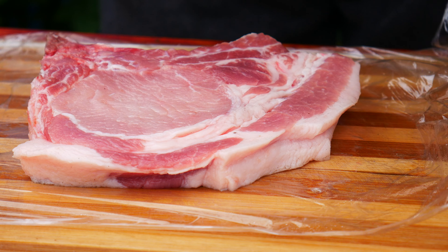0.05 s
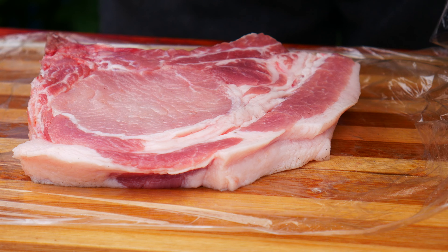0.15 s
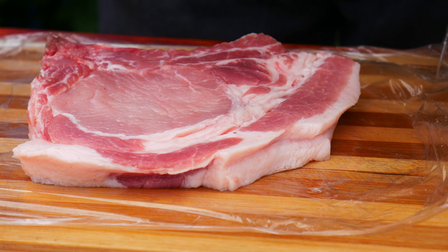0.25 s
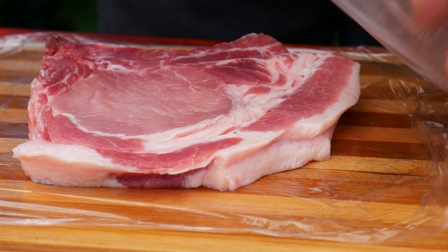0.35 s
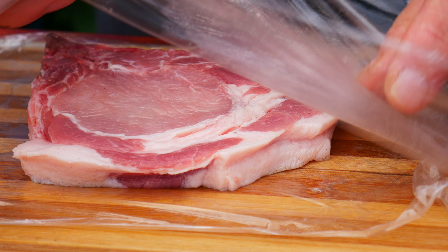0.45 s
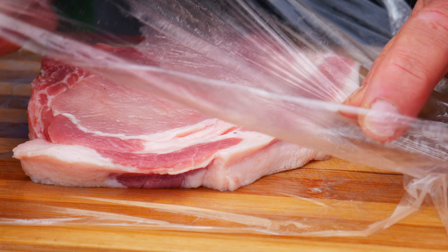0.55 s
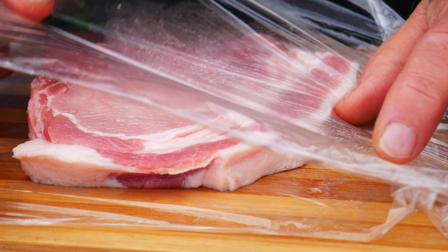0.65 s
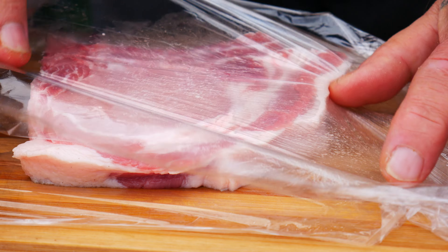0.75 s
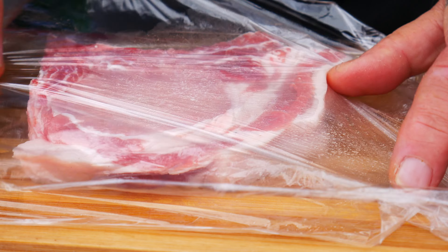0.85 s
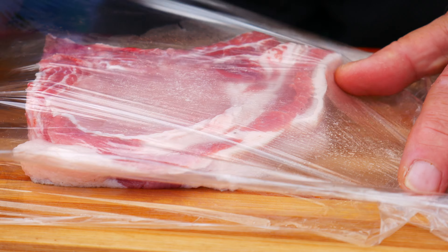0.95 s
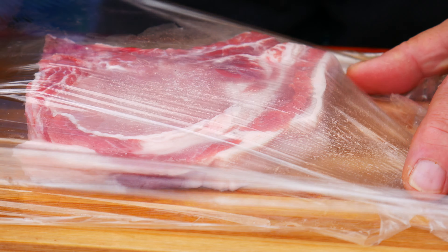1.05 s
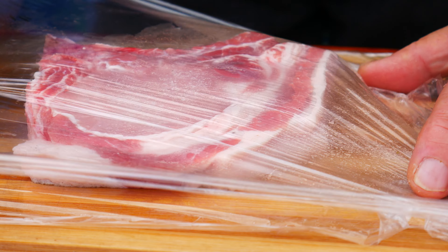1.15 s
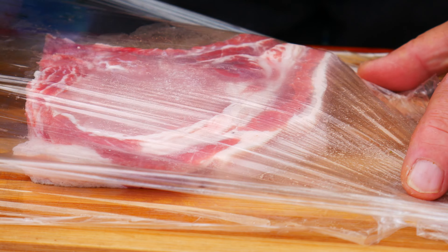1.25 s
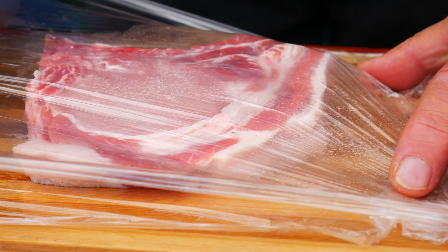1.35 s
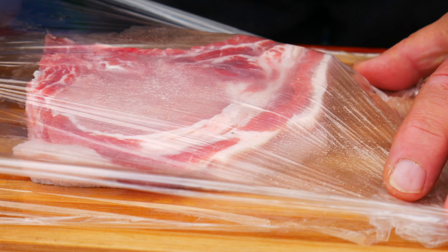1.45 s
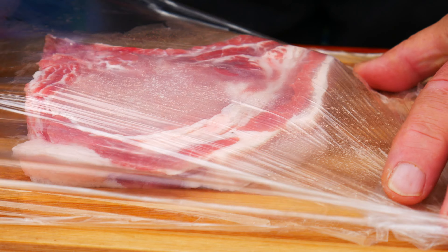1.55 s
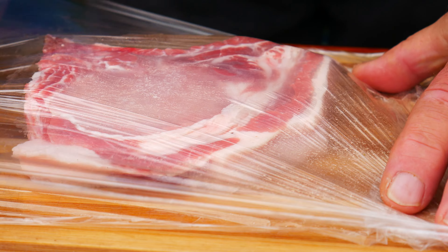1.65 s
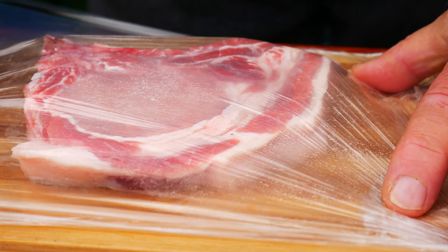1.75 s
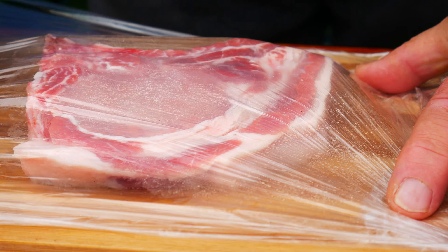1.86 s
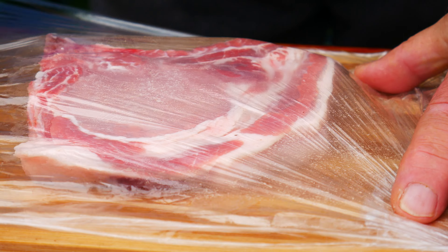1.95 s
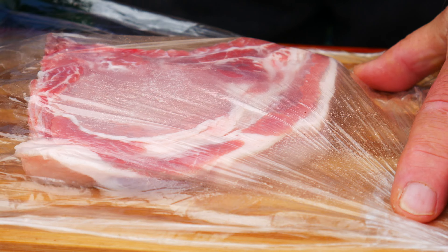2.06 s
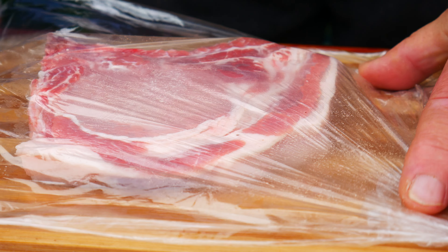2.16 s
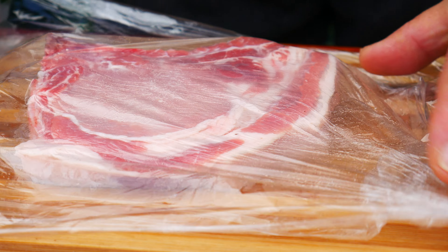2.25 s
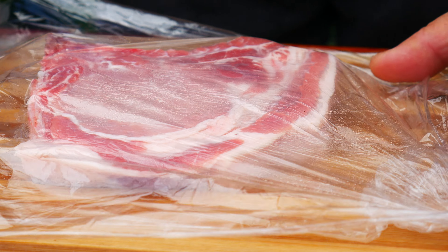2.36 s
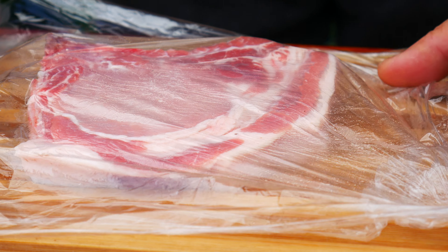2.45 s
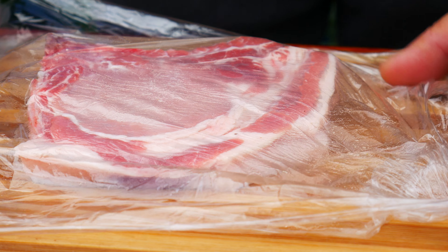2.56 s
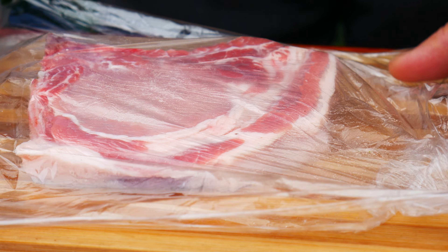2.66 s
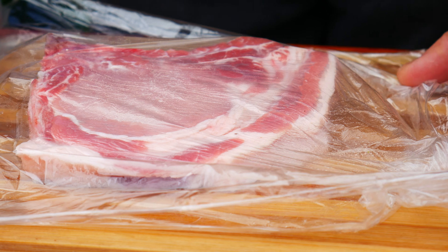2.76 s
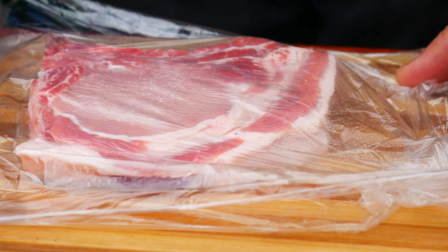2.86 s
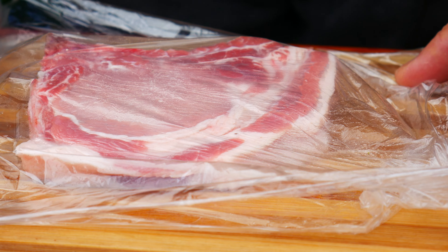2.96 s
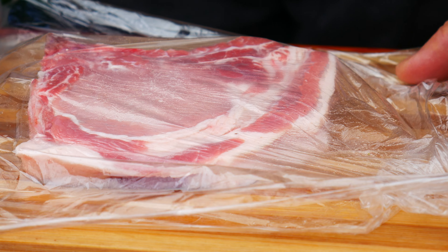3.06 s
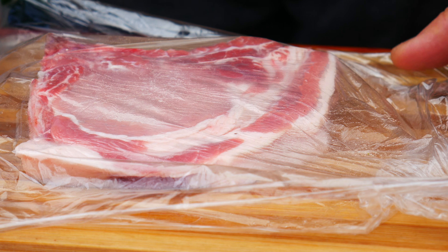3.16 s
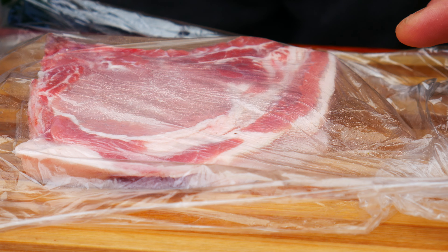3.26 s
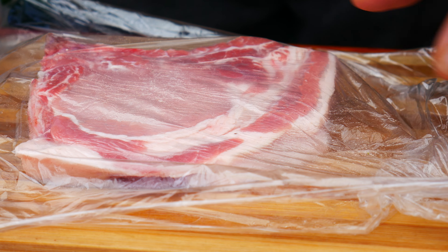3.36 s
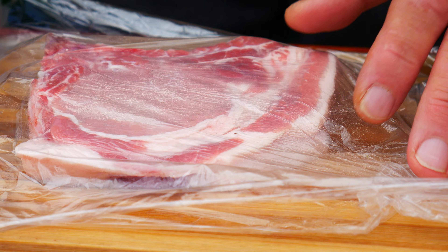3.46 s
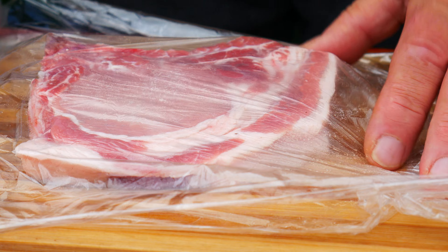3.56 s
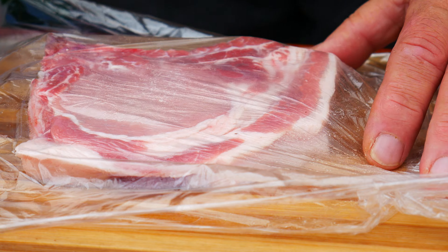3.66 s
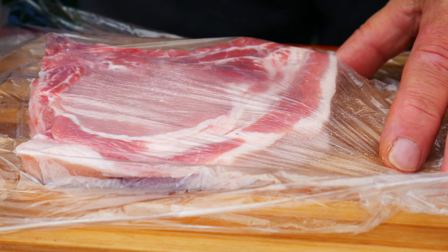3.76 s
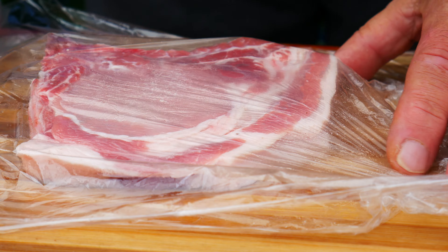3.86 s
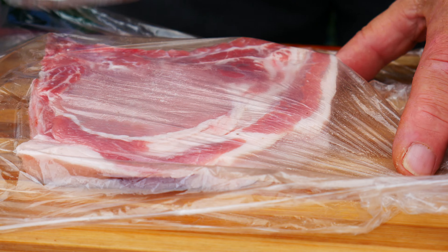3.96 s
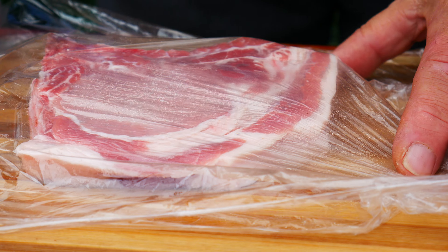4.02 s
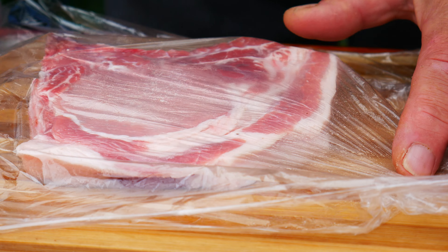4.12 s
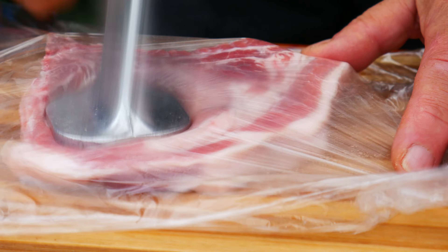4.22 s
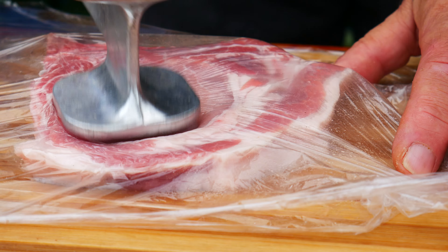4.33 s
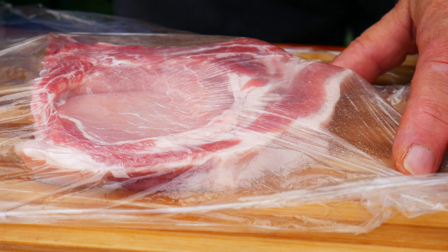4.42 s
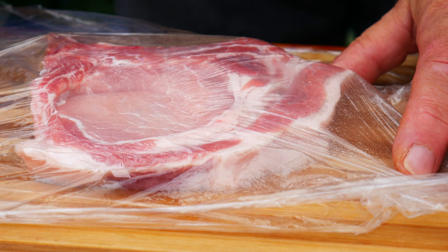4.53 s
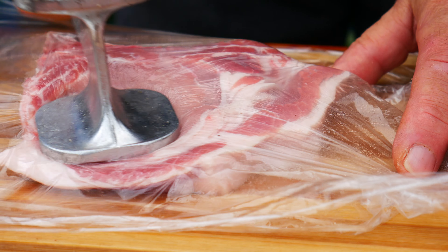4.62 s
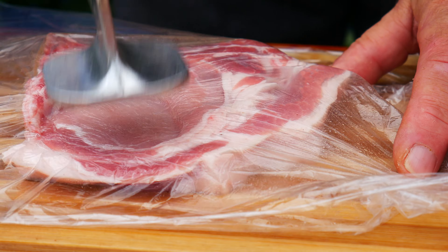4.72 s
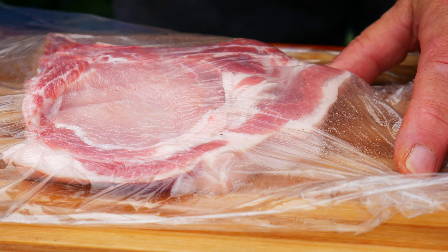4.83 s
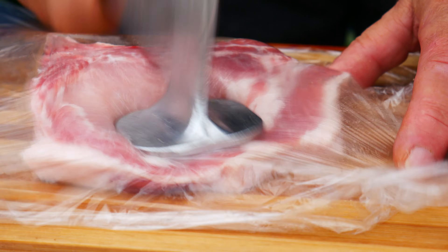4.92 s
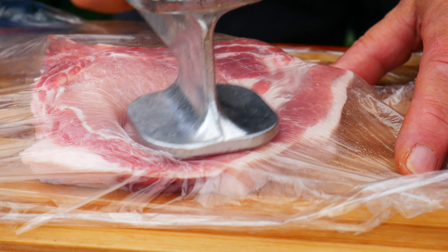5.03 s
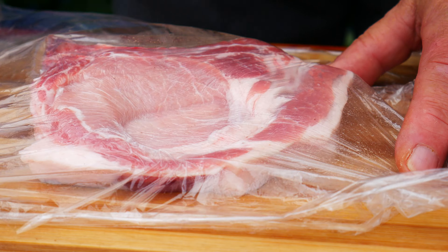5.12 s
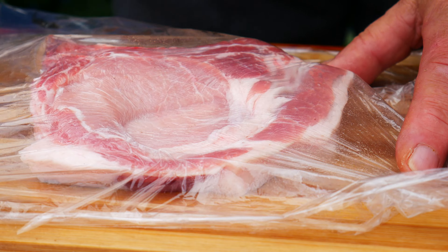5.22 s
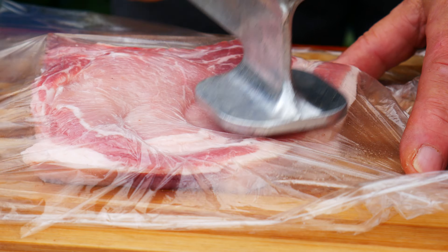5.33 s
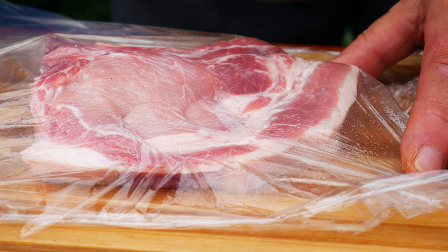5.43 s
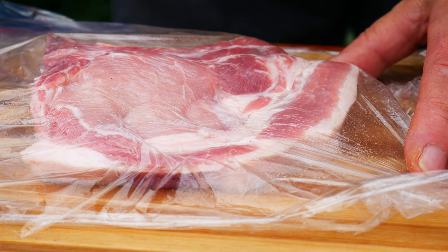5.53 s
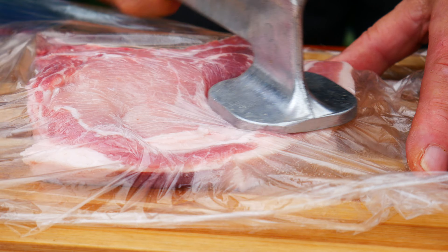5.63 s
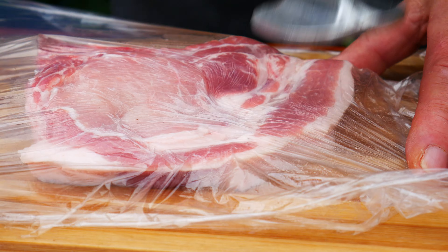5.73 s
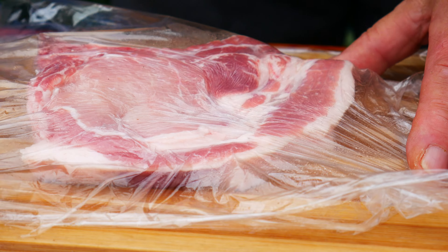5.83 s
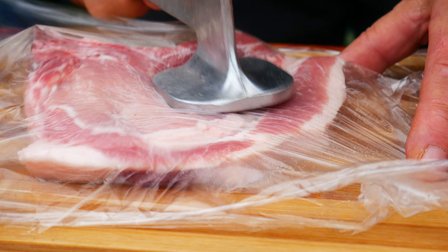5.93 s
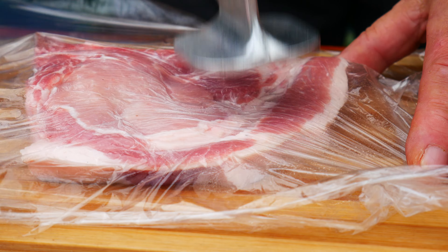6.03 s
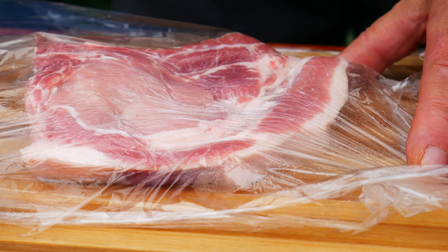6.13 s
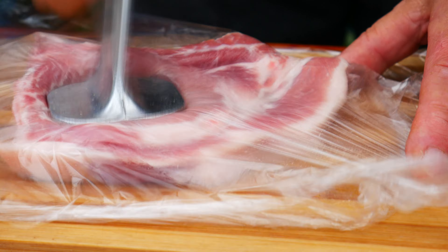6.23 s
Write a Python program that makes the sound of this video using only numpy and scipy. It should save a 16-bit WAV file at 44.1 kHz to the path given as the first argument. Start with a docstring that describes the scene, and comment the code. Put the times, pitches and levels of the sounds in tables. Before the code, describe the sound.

Cling film crackles softly, a utensil drawer knocks and rumbles, then a metal mallet pounds wrapped meat seven times, with sharp slaps and woody thuds.

```python
"""Pounding a wrapped pork chop

Cling film is pulled over the chop, and a kitchen drawer knocks, rolls and jingles as a mallet is fetched.
Then the metal mallet pounds the meat seven times: the film slaps, trapped air pops and the board thuds
on the counter of a small, lively kitchen; each blow's tail holds level briefly, then falls. Shaped noise
makes the air, rubbing, slaps and reflections; random clicks make the crackle and rolling; dying sines
make the wood, steel and popping air.
"""
import sys
import numpy as np
from scipy import signal
from scipy.fft import rfft, irfft
from scipy.io import wavfile
from scipy.ndimage import uniform_filter1d

SR = 44100
rng = np.random.default_rng(int(sys.argv[2]) if len(sys.argv) > 2 else 0)


def output_pcm(signal):
    """Save a mono or channel-first signal as 16-bit PCM at the path in sys.argv[1].

    Samples are clipped to [-1, 1] before scaling.
    """
    pcm = np.clip(np.atleast_2d(signal).T, -1, 1) * 32767
    wavfile.write(sys.argv[1], SR, np.round(pcm).astype(np.int16))


N = 277212
TIME = np.arange(round(.7 * SR)) / SR  # clock of one short sound [s]


def amp(db):
    """Turns decibels into gain."""
    return 10 ** (np.asarray(db) / 20)


def unit(x):
    """Scales a sound to an rms of one."""
    return x / np.sqrt(np.mean(x ** 2) + 1e-20)


def read(points, hz):
    """Reads a table between its points, on a log-frequency axis."""
    f, value = np.transpose(points)
    return np.interp(np.log(hz + 1), np.log(f + 1), value)


def add(mix, s, sound):
    """Mixes a sound in at time s [s]."""
    part = mix[round(s * SR):][:len(sound)]
    part += sound[:len(part)]


def wander(n, size):
    """Smooth chance that changes over about size samples; rms one."""
    once = uniform_filter1d(rng.standard_normal(n), size, mode="wrap")
    return unit(uniform_filter1d(once, size, mode="wrap"))


def grains(per_s, spread_db):
    """Random clicks, a few much larger than the rest; rms one."""
    size = amp(spread_db * np.minimum(rng.exponential(1, N), 4.5))
    happens = rng.random(N) < per_s / SR
    return unit(size * rng.standard_normal(N) * happens)


def bumps(per_s):
    """Random clicks of much the same size, pushing either way."""
    happens = rng.random(N) < per_s / SR
    return rng.uniform(.4, 1, N) * rng.choice([-1, 1], N) * happens


def strokes(rows, sag_db_per_s, release_db_per_s):
    """Gain of hand movements: each swells smoothly, sags while it is held, then dies away faster."""
    gain = np.zeros(N)
    for s, attack, hold, db in rows:
        t = np.arange(N) / SR - s
        swell = np.sin(np.pi / 2 * np.clip(t / attack, 0, 1)) ** 2
        sag = sag_db_per_s * np.maximum(t - attack, 0)
        release = release_db_per_s * np.maximum(t - attack - hold, 0)
        gain = np.hypot(gain, swell * amp(db - sag - release))
    return gain


def ring(hz, t60):
    """One mode: a sine that falls by 60 dB in t60 seconds."""
    return np.sin(2 * np.pi * hz * TIME) * 10 ** (-3 * TIME / t60)


def rise(seconds):
    """A soft start."""
    return 1 - np.exp(-TIME / seconds)


def colour(x, points, tilt=0, low_hz=1):
    """Gives x a spectrum, tilted [dB per octave] about the low middle and cut below low_hz; rms one."""
    hz = np.fft.rfftfreq(len(x), 1 / SR) + 1
    low_cut = np.hypot(1, (low_hz / hz) ** 2)
    gain = amp(read(points, hz) + tilt * np.log2(hz / 450)) / low_cut
    return unit(irfft(rfft(x) * gain, len(x)))


# share of the decay held back, by frequency: (frequency [Hz], share [0-1])
HOLD_SHARE = [(60, 0), (130, 0.42), (250, 1), (480, 0.8), (850, 0.02), (2000, 0.31), (12000, 0.29)]


def fall(hz, t60, hold_s):
    """Decay of one band, held back for the first hold_s seconds; the far room lingers faintly."""
    held = np.clip(read(HOLD_SHARE, hz), 0, 1) * np.minimum(TIME, hold_s)
    near = 10 ** (-3 * (TIME - held) / t60)
    fade = np.cos(np.pi / 2 * TIME / TIME[-1])
    far = amp(-23) * np.exp(-TIME / (.5 * t60)) * fade
    return np.hypot(near, far)


# how fast the kitchen's sound dies when not held: (frequency [Hz], time to fall 60 dB [s])
KITCHEN_DECAY = [(50, 0.16), (130, 0.26), (400, 0.27), (900, 0.28), (2500, 0.27), (6000, 0.29),
                 (14000, 0.11)]


def tail(points, tilt=0, low_hz=1, hold_s=0, count=16):
    """Dense reflections: each band is steady noise that dies at the kitchen's own rate."""
    spectrum = rfft(colour(rng.standard_normal(len(TIME)), points, tilt, low_hz))
    centres = np.geomspace(45, 15000, count)
    log_hz = np.log(np.fft.rfftfreq(len(TIME), 1 / SR) + 1)
    place = np.interp(log_hz, np.log(centres), np.arange(count))
    out = np.zeros(len(TIME))
    for k, hz in enumerate(centres):
        share = np.maximum(1 - abs(place - k), 0)  # neighbouring bands overlap as triangles
        band = irfft(spectrum * share, len(TIME))
        # even out the slow swells of the noise before letting it die
        swell = np.sqrt(uniform_filter1d(unit(band) ** 2, size=1500, mode="wrap") + 1e-6)
        out += band / swell * fall(hz, read(KITCHEN_DECAY, hz), hold_s)
    return out


# spectrum of the kitchen air: (frequency [Hz], relative level [dB])
AIR_SPECTRUM = [(15, -43.5), (25, -25.5), (59, 0.5), (97, -21), (120, -6), (175, -16.5), (384, -15),
                (427, -13), (575, -15), (624, -13), (1480, -32), (4870, -36), (16000, -45)]
AIR_DB = -63


def kitchen_air():
    """The quiet air of the kitchen: steady noise, strongest in the bass."""
    return amp(AIR_DB) * colour(rng.standard_normal(N), AIR_SPECTRUM)


# resonances of the stretched film: (frequency [Hz], width [Hz], level [dB])
FILM_RESONANCES = [(1140, 95, 7.5), (2180, 350, 2.5), (3480, 550, -1.5), (4650, 550, -3.5),
                   (7300, 7400, -12)]
# pulls that tighten, hold and go slack: (start [s], tightening [s], holding [s], level [dB])
FILM_PULLS = [(.15, 0.75, 0.38, -60.5), (1.48, 0.066, 1.95, -69.5), (3.5, .08, 0.22, -72.5),
              (4.45, 0.036, 0.41, -62), (5.83, 0.038, 0.17, -62)]
# single wrinkles snapping: (time [s], level [dB])
WRINKLE_SNAPS = [(1.056, -43.5), (4.518, -37)]
EASE_DB_PER_S, SLACK_DB_PER_S = 2.5, 81.5  # tension eases from the tightening on; slack adds to the fall
HISS_DB, CRINKLE_DB, CRINKLES_PER_S = -3.5, -4, 1400
SNAP_S = 0.0046  # how quickly a snap dies


def film():
    """Rubbing hiss, fine crackle and single snaps sound through the resonances of the taut film."""
    hz = np.geomspace(200, 16000, num=200)
    power = np.zeros(len(hz))
    for centre, width, db in FILM_RESONANCES:
        power += amp(db) ** 2 / (1 + (2 * (hz - centre) / width) ** 2) ** 1.3
    spectrum = np.transpose([hz, 10 * np.log10(power)])
    uneven = amp(2.5 * wander(N, size=500))
    crinkle = colour(grains(CRINKLES_PER_S, 2.7) * uneven, spectrum, tilt=1.2)
    hiss = colour(rng.standard_normal(N), spectrum, tilt=-.4)
    tension = strokes(FILM_PULLS, EASE_DB_PER_S, SLACK_DB_PER_S)
    out = tension * (amp(HISS_DB) * hiss + amp(CRINKLE_DB) * crinkle)
    for s, db in WRINKLE_SNAPS:
        snap = colour(rng.standard_normal(len(TIME)), spectrum, tilt=-6.5, low_hz=600)
        add(out, s, amp(db) * snap * np.exp(-TIME / SNAP_S))
    return out


# sticky film letting go of wet meat or steel: (time [s], length [s], level [dB])
FILM_PEELS = [(0.412, .12, -69), (4.476, 0.047, -56.5), (5.83, 0.088, -63.5)]


def peels():
    """Sticky film lets go in a short, bright sizzle of many small clicks."""
    out = np.zeros(N)
    spectrum = [(1500, -6), (4500, 2), (9000, -1), (12000, -12), (16000, -16)]  # (Hz, dB)
    sizzle = colour(grains(5000, 1.6), spectrum)
    for s, length, db in FILM_PEELS:
        part = sizzle[round(s * SR):][:round(length * SR)]
        add(out, s, amp(db) * part * signal.windows.tukey(len(part), .4))
    return out


# film squeaking as it stretches over the wet meat: (time [s], length [s], settled pitch [Hz],
# starting distance from that pitch [octaves], level [dB], overtones over the main tone [dB])
FILM_SQUEAKS = [(1.381, 0.06, 320, 0.53, -58.5, -0.5), (1.57, 0.051, 341, 0.41, -54.5, -1.5),
                (1.575, 0.12, 688, -0.34, -56, -27),
                (4.42, 0.037, 2550, 0.87, -59.5, -30),(5.815, 0.14, 509, -0.12, -34.5, -10)]
SETTLE_SHARE, WAVER = 0.229, 0.047  # share of its length a squeak takes to settle; rms pitch waver


def squeaks():
    """Taut film sticks and slips: each squeak swells and fades while its wavering pitch glides and settles."""
    out = np.zeros(N)
    for s, length, settled_hz, bend, db, over_db in FILM_SQUEAKS:
        u = np.arange(0, length, 1 / SR) / length  # progress from 0 to 1
        hz = settled_hz * 2 ** (bend * np.exp(-u / SETTLE_SHARE))
        wavering_hz = hz * (1 + WAVER * wander(len(u), size=100))
        phase = 2 * np.pi * np.cumsum(wavering_hz) / SR
        overtones = np.sin(2 * phase) + amp(-14) * np.sin(3 * phase)
        tone = np.sin(phase) + amp(over_db) * overtones
        add(out, s, amp(db) * tone * np.sin(np.pi * u) ** 2)
    return out


# shoves of the drawer: (start [s], speeding up [s], coasting [s], level [dB])
DRAWER_SHOVES = [(2.1, 0.12, .52, -27), (2.85, 0.063, 0.076, -42.5), (3.15, 0.072, 0.11, -45)]
# spectrum of the rolling runners: (frequency [Hz], relative level [dB])
ROLL_SPECTRUM = [(47, -52.5), (80, -37), (129, 18.5), (170, 6), (379, 18.5), (710, 5), (2230, -29.5),
                 (3080, -61.5), (3510, -30), (4360, -25), (5650, -53), (14000, -61)]
COAST_DB_PER_S, STOP_DB_PER_S = 31.5, 233  # friction slows the drawer; halting it adds to the fall


def drawer():
    """The runners rumble with many small bumps; the loose contents clatter when the drawer moves fast."""
    speed = strokes(DRAWER_SHOVES, COAST_DB_PER_S, STOP_DB_PER_S)
    rumble = colour(unit(bumps(340)) + 0.96 * rng.standard_normal(N), ROLL_SPECTRUM)
    rattle = np.exp(-TIME / .009) * rng.standard_normal(len(TIME))
    clatter = signal.fftconvolve(bumps(150), rattle)[:N]
    clatter = colour(clatter, [(300, -2.5), (900, 8.5), (1500, -1.5), (2200, -0.5),
                               (3200, -22), (6000, -24.5), (14000, -52.5)])  # (Hz, dB)
    looseness = np.sqrt(speed / speed.max())
    return speed * (amp(-0.5) * rumble + amp(-5) * looseness * clatter)


# steel utensils touching: (time [s], level [dB], pitch that the touch rings most [Hz])
STEEL_TOUCHES = [(1.825, -59, 5530), (1.853, -59, 3260), (2.16, -63, 5400), (2.222, -47, 7000),
                 (2.28, -43.5, 8500), (2.334, -53, 5100), (2.35, -47, 3620), (2.47, -55.5, 3480),
                 (2.48, -49, 1221), (2.805, -52, 3080), (3.13, -70.5, 2870)]
# ringing modes of the utensils: (nominal frequency [Hz], level [dB], time to fall 60 dB if left alone [s])
STEEL_MODES = [(1221, 4, .8), (1432, -6, .55), (2051, -10, .45), (2943, -12, 1.5), (3490, 2, .6),
               (3645, -3, .7), (3885, -2, .45), (4725, -5, .4), (5550, -1, .32), (6620, -6, .36),
               (8095, -13, .42), (9765, -18, .55), (10485, -19, .4), (11710, -20, .5), (12975, -23, .45)]
REACH_OCTAVES = 0.19  # how far a touch spreads over the modes
FLUTTER_DB, CHATTER_DB = 2, -25.5  # rms flutter of the ring; gain of the chatter


def utensils():
    """Touches ring the nearest steel modes, whose level flutters irregularly; the rolling drawer adds chatter."""
    out, steel = np.zeros(N), np.zeros(len(TIME))
    fade = np.cos(np.pi / 2 * TIME / TIME[-1])
    for hz, mode_db, t60 in STEEL_MODES:
        steel += amp(mode_db) * ring(hz, t60) * np.exp(-TIME / .06)  # chatter dies sooner
        for s, db, touch_hz in STEEL_TOUCHES:
            flutter = amp(FLUTTER_DB * wander(len(TIME), size=700))
            distance = np.log2(hz / touch_hz) / REACH_OCTAVES
            mode = ring(hz + 4 * rng.standard_normal(), t60) * flutter / (1 + distance ** 2)
            add(out, s, amp(db + mode_db) * mode * rise(0.002) * fade)
    speed = strokes(DRAWER_SHOVES, COAST_DB_PER_S, STOP_DB_PER_S)
    touches = bumps(170) * speed ** 2 / speed.max()
    return out + amp(CHATTER_DB) * signal.fftconvolve(touches, steel)[:N]


# drawer and counter knocks: (time [s], room answer level [dB], hardness [dB per octave],
# lowest frequency [Hz], thump level [dB], thump pitch [Hz], clack level [dB])
WOOD_KNOCKS = [(0.533, -57.5, -3.5, 520, -33, 655, -83), (0.9058, -22.5, -6, 189, -14, 282, -57),
               (1.003, -42.5, 1, 237, -33, 594, -68), (1.747, -23, -6, 184, -50, 400, -59),
               (1.7692, -12, -2.5, 137, 3, 276, -39.5), (2.223, -12.5, -3.5, 263, -1.5, 1100, -42),
               (2.254, -27, 4, 232, -33, 500, -52), (2.389, -27, 0.5, 297, -19, 696, -78),
               (2.6266, -19.5, -4.5, 271.3, -4, 773, -46), (2.804, -19, 0, 426, -6, 700, -26),
               (2.82, -29, -5, 500, -33, 742, -38), (3.013, -45, 0, 340, -32, 600, -75),
               (3.207, -43, -2, 318, -26, 440, -67), (3.3495, -30.5, -5, 211, -17, 670, -70),
               (5.894, -34.5, -7.5, 220, -31, 306, -73)]
# spectrum of a wooden knock: (frequency [Hz], relative level [dB])
KNOCK_SPECTRUM = [(40, -2), (130, -6.5), (175, -6), (280, 3.5), (500, 4.5), (850, -1), (1250, -14),
                  (1600, -21.5), (2400, -22.5), (4000, -39.5), (7000, -52), (15000, -69.5)]
# spectrum of a hard clack: (frequency [Hz], relative level [dB])
CLACK_SPECTRUM = [(600, -0.5), (1600, -14), (2500, 7), (3200, 5), (4400, -12), (6000, -16.5), (8000, -16),
                  (10000, -31), (12000, -41), (15000, -40)]
# modes of the board on its counter: (nominal frequency [Hz], level [dB], time to fall 60 dB when not held [s])
BOARD_MODES = [(134.5, 2, 0.3), (211, -9.5, 0.35), (299, -1.5, 0.28), (380.5, -4.5, 0.32),
               (414.7, -3, 0.29), (527, -7, 0.41), (787, -9.5, 0.32)]


def knocks():
    """Wooden knocks: a short thump, a hard clack, the counter's lowest mode and the room's answer."""
    out = np.zeros(N)
    hum_hz, _, hum_t60 = BOARD_MODES[0]
    for s, db, tilt, low_hz, thump_db, thump_hz, clack_db in WOOD_KNOCKS:
        low_cut = np.hypot(1, (low_hz / hum_hz) ** 2)
        counter = amp(-3.0) * ring(hum_hz, hum_t60) * rise(.012) / low_cut
        early_boost = 1.09 + 0.25 * np.exp(-TIME / 0.022)
        room = tail(KNOCK_SPECTRUM, tilt, low_hz) * rise(0.0019) * early_boost + counter
        clack = tail(CLACK_SPECTRUM) * (.32 + .9 * np.exp(-TIME / .012))
        panel = ring(thump_hz, 9 / thump_hz) * rise(.5 / thump_hz)
        # the slope of the ring: a thump without a lasting push
        thump = np.gradient(panel) * SR / (2 * np.pi * thump_hz)
        add(out, s, amp(db) * room + amp(thump_db) * thump + amp(clack_db) * clack)
    return out


# mallet blows: (first touch [s], time to squeeze the air out [s], thud level [dB], air pop level [dB],
# slap level [dB], squirt pitch [Hz], squirt over the slap [dB], board drops back after the squeeze [s],
# drop level [dB])
MALLET_BLOWS = [(4.259, 0.0026, -21, 1.5, -13.5, 3620, -7.5, .11, -34.5),
                (4.6206, 0.00098, -18, 1, -3.5, 1960, -18, 0.081, -21.5),
                (4.9630, 0.0029, -19.5, -8, -16, 3710, 8.5, 0.071, -23),
                (5.292, 0.0048, -19.5, -5, -22.5, 3470, -0.5, 0.068, -22.5),
                (5.6174, 0.0058, -17.5, -11, -30.5, 3280, 5.5, .079, -26),
                (5.9343, 0.005, -16, -15, -28, 3350, 4.5, .078, -15),
                (6.2553, 0.0055, -20.5, -16, -21.5, 3550, -6, .08, -22)]
# spectrum of the film slap: (frequency [Hz], relative level [dB])
SLAP_SPECTRUM = [(500, 9), (1300, -5), (2000, 8.5), (2800, -3), (5000, -3.5), (6500, 1.5), (7900, -4.5),
                 (9800, -0.5), (11000, -5.5), (12800, -2), (16000, -10)]
SLAP_MIN_S, SLAP_SHARE = 0.0019, 0.89  # a slap lasts a moment plus a share of the squeeze


def slaps():
    """A burst of crackle and a wet squirt as the face meets the film, echoed by the counter and a wall."""
    out = np.zeros(N)
    for s, squeeze, _, _, db, squirt_hz, squirt_db, _, _ in MALLET_BLOWS:
        length = np.hypot(SLAP_MIN_S, SLAP_SHARE * squeeze)
        hiss, wet = rng.standard_normal((2, len(TIME)))
        pocket = [(squirt_hz / 1.7, -24), (squirt_hz, 0), (squirt_hz * 1.2, -5), (squirt_hz * 1.6, -28)]
        burst = colour(hiss, SLAP_SPECTRUM) + amp(squirt_db) * colour(wet, pocket)
        burst *= rise(length * 0.5) * np.exp(-(TIME / length) ** 3)
        # set the burst's energy from its length and its two levels
        burst *= amp(db) * np.hypot(1, amp(squirt_db)) * np.sqrt(length * SR / np.sum(burst ** 2))
        for delay, echo_db in [(0, -7), (.0043, -21.5), (.029, -25.5)]:  # direct, then two echoes
            add(out, s + delay, amp(echo_db) * burst)
        squelch = amp(2.5 * wander(len(TIME), size=120))
        room = (amp(-44.5) * tail(SLAP_SPECTRUM) + amp(squirt_db - 23) * tail(pocket)) * squelch
        add(out, s, amp(db) * np.sqrt(length / 0.018) * room * rise(.003))
    return out


# spectrum of the mallet's thud: (frequency [Hz], relative level [dB])
THUD_SPECTRUM = [(30, -5.5), (50, -5), (90, 8), (170, -3), (250, -0.5), (420, -1.5), (800, -3),
                 (1150, -12.5), (1600, -24.5), (4000, -39.5), (6000, -44.5), (11000, -45.5), (16000, -46.5)]
HOLD_S = 0.067  # how long the tail is held
# the flatter the face lands, the shorter the squeeze: the tail is brighter and the pop higher
FLAT_TILT_DB, DULLING_DB_PER_S = 2.5, 406  # tail brightness per octave, and its loss with squeeze time
FLAT_POP_HZ, POP_SAG_HZ_PER_S = 837, 35000  # pop pitch, and its loss with squeeze time
PUSH_DB = 12  # gain of the shove of the meat, on top of the thud level
DROP_SLAP_DB = -10.5  # gain of the meat's wet slap as the board lands, on top of the drop level


def mallet():
    """Each blow pops the air out, shoves the meat and rings the board, which hops and drops back."""
    out = np.zeros(N)
    for s, squeeze, db, pop_db, _, _, _, hop, drop_db in MALLET_BLOWS:
        board = np.zeros(len(TIME))
        for hz, mode_db, t60 in BOARD_MODES:
            cycles = hz * rng.uniform(0.99, 1.01) * TIME + rng.random()
            board += amp(mode_db) * np.sin(2 * np.pi * cycles) * fall(hz, t60, HOLD_S)
        brightness = FLAT_TILT_DB - DULLING_DB_PER_S * squeeze
        uneven = amp(2 * wander(len(TIME), size=300))
        rattle = tail(THUD_SPECTRUM, brightness, hold_s=HOLD_S) * uneven
        body = amp(1.0) * rattle * rise(0.0037) + amp(-2.0) * board * rise(0.0045)
        u = TIME / 0.0015
        push = 3.1 * u * (1 - u / 2) * np.exp(-u)  # pressure rises, then rebounds
        pop = ring(FLAT_POP_HZ - POP_SAG_HZ_PER_S * squeeze, .019) * rise(.0003)
        add(out, s + squeeze, amp(db) * (body + amp(PUSH_DB) * push) + amp(pop_db) * pop)
        drop = tail(KNOCK_SPECTRUM, -3.3, 220) * rise(0.00044) * np.exp(-TIME / 0.16)
        drop += amp(3.5) * ring(369.5, 0.117) * rise(0.0058)
        smack = colour(rng.standard_normal(len(TIME)), SLAP_SPECTRUM, tilt=-9, low_hz=1120)
        smack *= rise(0.0012) * np.exp(-TIME / 0.0066)
        add(out, s + squeeze + hop, amp(drop_db) * (drop + amp(DROP_SLAP_DB) * smack))
    return out


def scene():
    """All sources together over the quiet air of the kitchen, as one channel."""
    background = kitchen_air() + film() + peels() + squeaks()
    fetching = drawer() + utensils() + knocks()
    pounding = slaps() + mallet()
    return (background + fetching + pounding)[None]


EDGE_HZ = 16200  # upper band limit


def record(dry):
    """The microphone sheds the deepest bass and the hardest peaks clip; then the band limit."""
    high_pass = signal.butter(5, 39, "highpass", fs=SR, output="sos")
    lean = signal.sosfilt(high_pass, dry)
    edge = signal.firwin(255, EDGE_HZ, window=("kaiser", 9), fs=SR)
    return signal.oaconvolve(np.clip(lean, -.93, .93), edge[None], "same")


dry = scene()
out = record(dry)
output_pcm(out)
```